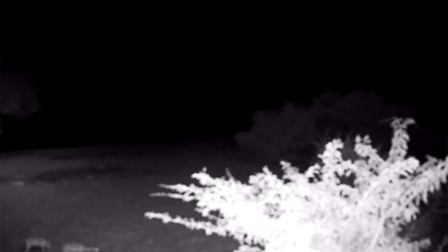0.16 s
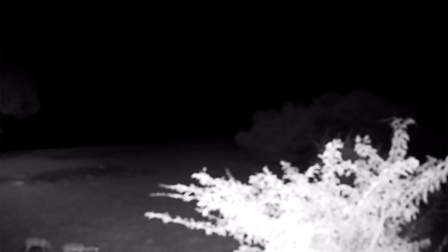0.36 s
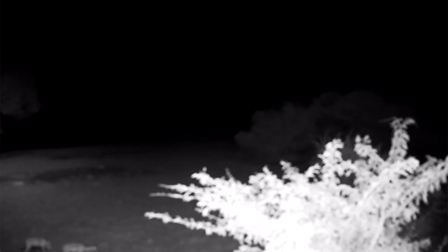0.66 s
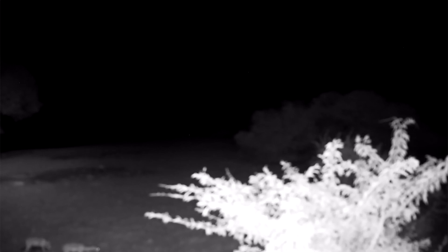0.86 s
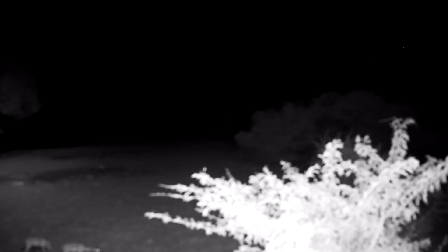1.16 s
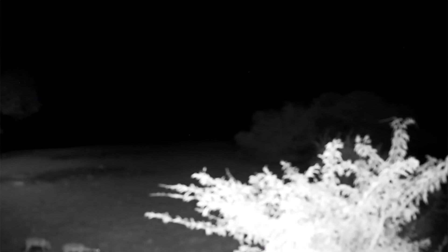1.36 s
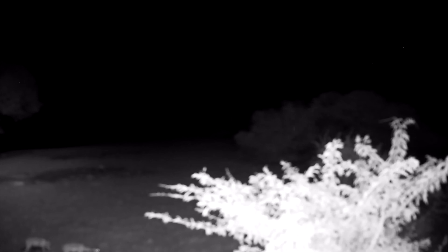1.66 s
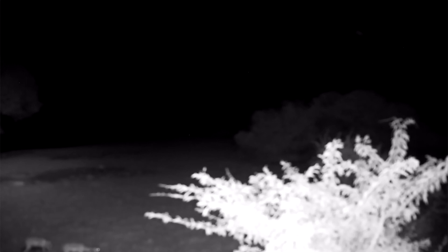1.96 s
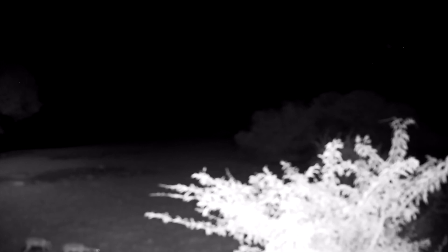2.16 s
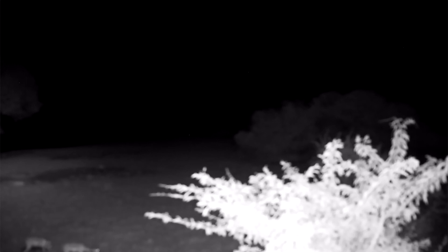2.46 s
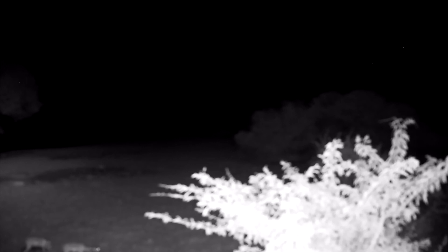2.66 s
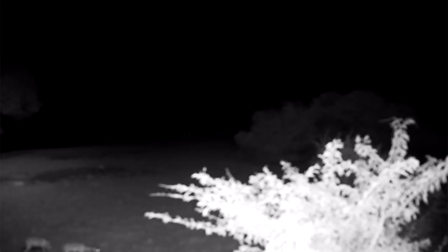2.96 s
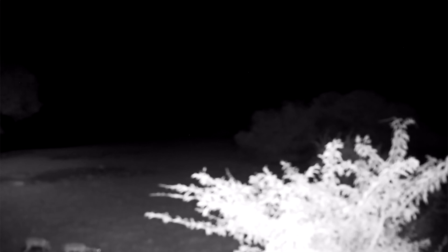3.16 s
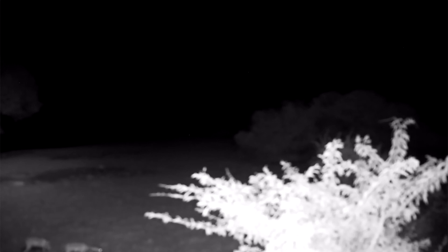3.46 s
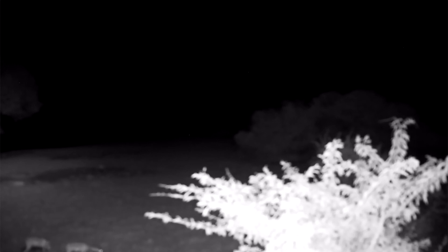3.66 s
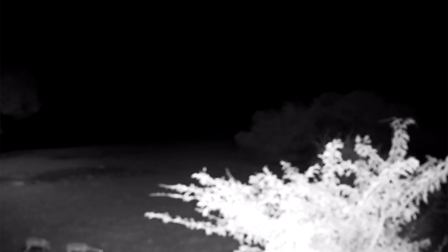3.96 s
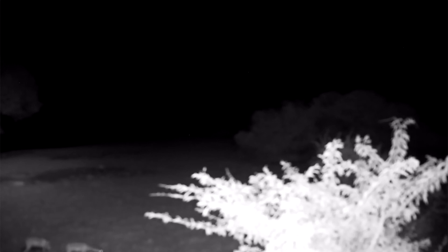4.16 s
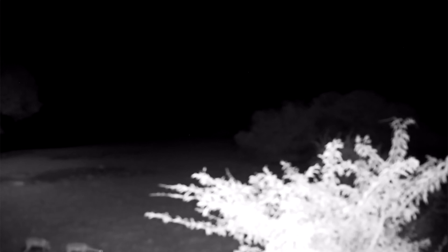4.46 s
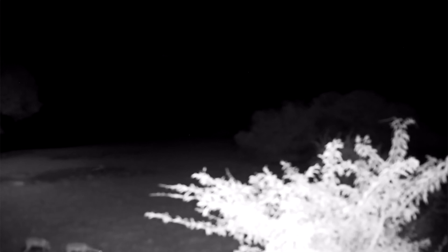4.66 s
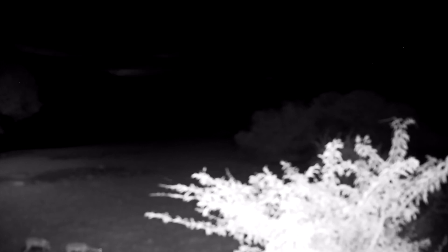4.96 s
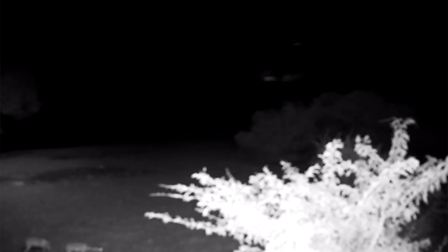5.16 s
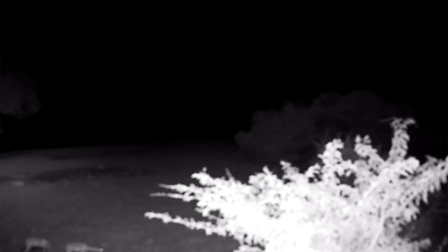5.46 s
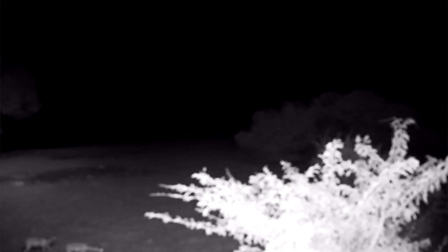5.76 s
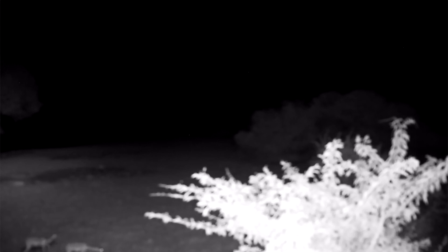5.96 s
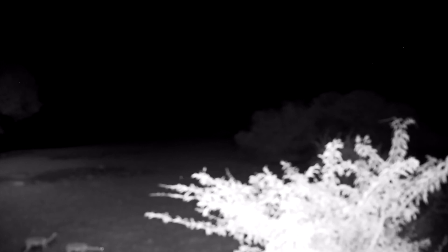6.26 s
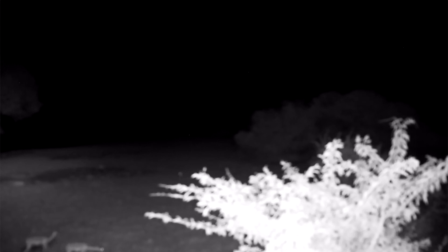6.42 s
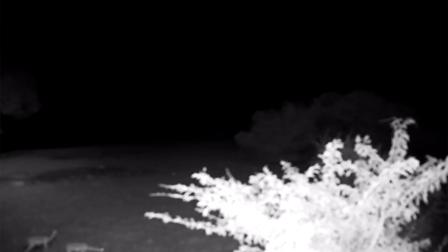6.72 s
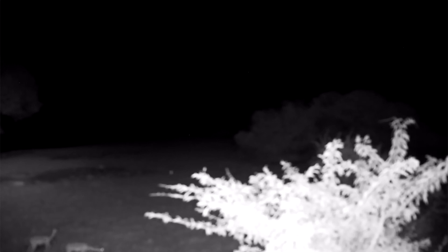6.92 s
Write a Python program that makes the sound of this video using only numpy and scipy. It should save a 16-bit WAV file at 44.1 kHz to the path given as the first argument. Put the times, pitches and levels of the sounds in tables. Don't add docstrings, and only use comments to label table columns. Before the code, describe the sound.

A nocturnal pondside scene, dense and bright throughout its seven seconds. Two frog choruses of tiny pulsed notes blur into a shrill bed, lower voices near 3 kHz and higher near 6 kHz, swelling to a peak around 4 s and easing near 5.2. Sharp taps click at 0.2 and 0.4 s. A prominent frog whistles short rising notes at about 0.4, 1.3, 2.1, 2.9, 3.7 (loudest), 4.4, 5.1, 5.9 and 6.7 s. Others make quick upward, water-drop whoops irregularly, with brief trills, strongest near 3 s. A field cricket gives five-pulse chirps nearly four times a second; a katydid rasps ten strokes a second, swelling and fading, beneath a thin high buzz and soft mole-cricket purr. Faint plops come around 6.5 and 6.9 s. Far traffic hums weakly, fullest near 4.7 s. The small open-air microphone sounds thin, with little bass and a cut top.

```python
import sys
import numpy as np
from scipy import signal
from scipy.fft import rfft, irfft
from scipy.io import wavfile
from scipy.ndimage import map_coordinates

SR = 44100
rng = np.random.default_rng(int(sys.argv[2]) if len(sys.argv) > 2 else 0)


def master_out(mix):
    frames = np.transpose(np.atleast_2d(mix))
    ceiling = np.clip(frames, -1, 1)
    pcm = np.round(ceiling * 32767).astype(np.int16)
    wavfile.write(sys.argv[1], SR, pcm)


def invert_db(x):
    u = np.asarray(x, float) / 20
    return 10 ** u


N = 312669
TIME = np.arange(N) / SR


def rms_one(x):
    return x / np.sqrt(np.mean(x ** 2) + 1e-20)


def band(x, low_hz, high_hz):
    return signal.sosfilt(signal.butter(3, [low_hz, high_hz], "band", fs=SR, output="sos"), x)


def drift(rate_hz):
    knots = rng.standard_normal(400)
    return map_coordinates(knots, [TIME * np.clip(rate_hz, .1, 50)], order=3)


def ticks(rate_hz):
    return np.flatnonzero(np.diff(np.floor(np.cumsum(rate_hz) / SR)))


def add_glide(out, times_s, hz, db):
    at = np.arange(round(times_s[0] * SR), min(round(times_s[-1] * SR), N))
    turns = np.cumsum(np.interp(at / SR, times_s, hz)) / SR
    out[at] += invert_db(np.interp(at / SR, times_s, db)) * np.sin(2 * np.pi * turns)


def pulses(start_s, gain, hz, rise_s, decay_s):
    age = np.arange(700) / SR
    shape = (1 - np.exp(-age / rise_s)) ** 2 * np.exp(-age / decay_s)
    wave = np.sin(2 * np.pi * (hz[:, None] * age + rng.random((len(hz), 1))))
    sound = gain[:, None] * shape / shape.max() * wave
    at = np.clip((start_s * SR).astype(int)[:, None] + np.arange(700), 0, N)
    return np.bincount(at.ravel(), sound.ravel(), N + 1)[:N]


def notes(centre_s, db, hz, period_s, decay_s, spread_hz, slide_hz, width_s, uneven_db, edge, count=9):
    chance = np.clip(rng.standard_normal((len(centre_s), count, 3)), -1.6, 1.6)
    step = np.arange(count) - count // 2
    offset_s = period_s * (step + .04 * uneven_db * chance[..., 0])
    effort = np.exp(-np.abs(offset_s / width_s) ** edge)
    gain = invert_db(db[:, None] + uneven_db * chance[..., 1]) * effort
    pitch_hz = hz[:, None] + slide_hz * step + spread_hz * chance[..., 2]
    start_s = centre_s[:, None] + offset_s - decay_s
    return pulses(start_s.ravel(), gain.ravel(), pitch_hz.ravel(), .0006, decay_s)


def bouts(rows):
    return np.transpose([(s + gap * k, db) for s, gap, count, db in rows for k in range(round(count))])


def echoes(x, bounces=()):
    # t/s, level/dB
    banks = [(.014, -30), (.03, -33), (.045, -27), (.062, -33), (.2, -52)]
    lag_s = np.arange(round(.2 * SR)) / SR
    smear = invert_db(np.interp(lag_s, *np.transpose(banks), left=-90))
    space = 0.19 * rng.standard_normal(len(lag_s)) * smear
    space[0] = 1
    for s, db in bounces:
        space[round(s * SR)] = invert_db(db)
    return signal.fftconvolve(x, space)[:N]


def air():
    # f/Hz, density/(dB per Hz)
    air_spectrum = [(60, -45), (110, -32), (200, -27.5), (540, -19.5), (800, -28), (1300, -34),
                    (1900, -20.5), (2400, -22), (4300, -22.5), (7200, -28), (8400, -69), (10000, -38),
                    (13000, -46)]
    # t/s, level/dB
    traffic = [(0, -57), (.7, -60), (1.5, -58.5), (2.2, -56), (3, -57), (3.5, -56), (3.9, -53),
               (4.7, -48.5), (5.6, -52), (6.3, -56), (7.09, -58.5)]
    hz = np.fft.rfftfreq(N, 1 / SR) + 1
    knot_hz, knot_db = np.transpose(air_spectrum)
    noise = rfft(rng.standard_normal(N)) * invert_db(np.interp(np.log(hz), np.log(knot_hz), knot_db))
    bass = 1 / (1 + (hz / 800) ** 4)
    hum = rms_one(irfft(noise * bass, N))
    hiss = rms_one(irfft(noise * (1 - bass), N))
    hum_db = np.interp(TIME, *np.transpose(traffic)) - 5.5
    return invert_db(hum_db) * hum + invert_db(-40 + 1.05 * drift(9)) * hiss


def mole_cricket(level_db):
    out = 0
    for rate_hz, db in [(91.4, 0), (87, -13)]:
        beats_s = ticks(rate_hz + 0.3 * drift(2.2)) / SR
        chance = rng.standard_normal((len(beats_s), 2))
        gain, hz = invert_db(db + 1.8 * chance[:, 0]), 1690 + 15 * chance[:, 1]
        out = out + pulses(beats_s, gain, hz, .003, .0022)
    return invert_db(level_db + 2.0) * rms_one(band(out, 1592, 1780))


def rasp(rate_hz, jitter_s, accent_db, modes):
    tooth = ticks(rate_hz * (1 + 0.0012 * drift(2.7)))
    chance = rng.standard_normal((len(tooth), 2))
    at = np.clip(tooth + (jitter_s * SR * chance[:, 0]).astype(int), 0, N - 1)
    accented = np.arange(len(tooth)) % 3 == 0
    clicks = np.zeros(N) + 1e-18
    clicks[at] = invert_db(accent_db * accented + 1.0 * chance[:, 1])
    out = 0
    for k, (hz, width_hz, db) in enumerate(modes):
        r = np.exp(-np.pi * width_hz / SR)
        poles = [1, -2 * r * np.cos(2 * np.pi * hz / SR), r * r]
        ring = signal.lfilter([1 - r * r, 0, r * r - 1], poles, clicks)
        out = out + (-1) ** k * invert_db(db) * ring
    return rms_one(out)


def high_buzz():
    # f/Hz, width/Hz, level/dB
    buzz_modes = [(10260, 200, -13), (10680, 190, 1.5), (11610, 710, 3.5), (11460, 290, -18),
                  (12360, 610, 4)]
    regular = rasp(584.4, .00002, 9.8, buzz_modes)
    ragged = rasp(1730, .0004, 0, buzz_modes)
    return invert_db(-57.5) * band(regular + 1.37 * ragged, 9600, 12200)


def katydid():
    # t/s, level/dB
    effort = [(0, -47.5), (.75, -44.5), (1.17, -52), (1.5, -45), (1.65, -49), (2.15, -38), (2.55, -45),
              (2.8, -34.5), (3.17, -43), (3.4, -34), (3.8, -32.5), (4.1, -43), (4.8, -34.5), (5.1, -40),
              (5.4, -43.5), (5.85, -33), (6.54, -47.5), (7.09, -34)]
    # t/s, level/dB
    stroke_shape = [(-.042, -40), (-.034, -12), (-.018, -4), (.005, 0), (.015, -2), (.02, -9), (.032, -40)]
    # f/Hz, width/Hz, level/dB
    wing_modes = [(6070, 1230, 4), (7580, 750, 8.5), (7802, 467, 8.5), (8690, 670, -8), (9150, 310, -10)]
    first_s, period_s = .088, .10232
    return_db = -21
    stroke = np.zeros(N + SR)
    shape = invert_db(np.interp(np.arange(-.045, .045, 1 / SR), *np.transpose(stroke_shape)))
    for s in np.arange(first_s, N / SR, period_s):
        db = np.interp(s, *np.transpose(effort)) + 1.0 * rng.standard_normal()
        stroke[round((s - .045) * SR):][:len(shape)] += invert_db(db) * shape
    teeth = sum(rasp(rate_hz, .0005, 0, wing_modes) for rate_hz in (380, 530, 710, 890))
    after = invert_db(np.interp(TIME, *np.transpose(effort)) + return_db)
    return invert_db(4) * (stroke[:N] + after) * band(rms_one(teeth), 6000, 9750)


def field_cricket():
    # t of first stroke/s, level/dB
    chirps = [(0.055, -25.5), (0.324, -27), (0.6, -25), (0.877, -27.5), (1.222, -24), (1.495, -24),
              (1.794, -22.5), (2.06, -24), (2.311, -26), (2.595, -26), (2.839, -29), (3.086, -43),
              (3.332, -26), (3.613, -25), (3.883, -23), (4.175, -28), (4.365, -25), (4.672, -26),
              (4.906, -35), (5.175, -24.5), (5.359, -25), (5.584, -22.5), (5.848, -26), (6.091, -27),
              (6.376, -22), (6.649, -23), (6.896, -23)]
    out = np.zeros(N)
    late_s = .0007 * rng.standard_normal((len(chirps), 5))
    for (s, db), jitter_s in zip(chirps, late_s):
        for start_s in s - .008 + .0313 * np.arange(5) + jitter_s:
            times_s = start_s + np.array([0, .004, .012, .017])
            add_glide(out, times_s, [5220, 5244, 5034, 4956], db + np.array([-9.5, -5.5, -9.5, -4.0]))
    return out


def knocks():
    # t/s, level/dB, f/Hz, decay/s
    taps = [
        (.226, -22, 1010, 0.00017),
        (.427, -29, 1020, 0.00014),
        (2.225, -51, 900, .0006),
        (2.39, -50, 900, .0006),
        (2.47, -45, 900, 0.00037),
        (6.483, -52.5, 767, 0.016),
        (.61, -54, 730, 0.0041),
        (6.928, -56, 840, 0.0017),
    ]
    out = 0
    for s, db, hz, decay_s in taps:
        out = out + pulses(np.array([s]), invert_db([db + 16]), np.array([hz]), 0.12 * decay_s, decay_s)
    return band(band(out, 500, 2600), 480, 1700)


def trill():
    # t of first note/s, gap/s, notes, level/dB
    trill_bouts = [
        (.035, 0.041, 5, -34),
        (3.004, 0, 1, -32),
        (3.036, .0455, 5, -27.5),
        (3.521, .038, 2, -35),
        (3.628, 0.052, 2, -36),
        (5.218, .045, 4, -31.5),
        (6.535, 0.052, 4, -37),
    ]
    s, db = bouts(trill_bouts)
    return notes(s - .001, db + 12, 4120 + 0 * s, period_s=0.0058, decay_s=0.00143, spread_hz=87,
                 slide_hz=20, width_s=.006, uneven_db=1.4, edge=5)


def whoops():
    # t/s, level/dB, climb/s, top f/Hz
    calls = [(0.251, -35.5, 0.025, 2370), (0.485, -37.5, 0.019, 2106), (0.516, -56, 0.075, 1674),
             (1.004, -33.5, 0.029, 2580), (1.263, -31, 0.029, 2204), (1.387, -48.5, 0.052, 1824),
             (1.491, -53.5, 0.07, 1770), (1.618, -35.5, 0.029, 2430), (1.677, -46, 0.024, 2150),
             (2.696, -41.5, 0.021, 2040), (2.73, -36.5, 0.032, 2320), (2.9, -37.5, 0.078, 2270),
             (2.981, -34.5, 0.024, 2320), (3.041, -52, 0.052, 1560), (3.168, -40, 0.022, 2035),
             (3.225, -52, 0.048, 1990), (3.926, -29, 0.025, 2053), (4.172, -33, 0.03, 2630),
             (4.895, -30.5, 0.033, 2445), (5.337, -31, 0.02, 2510), (5.472, -54, 0.06, 1660),
             (5.588, -32.5, 0.033, 2445), (6.064, -30.5, 0.027, 2070), (6.254, -37.5, 0.021, 1984),
             (6.292, -34.5, 0.039, 2410), (1.775, -49.5, .035, 1890), (5.07, -55, 0.049, 1760),
             (6.455, -46, 0.043, 1770), (6.34, -56, .045, 1600)]
    # t/s, level/dB
    bounces = [(.0035, -2), (.0073, -7), (.0112, -12)]
    out, share = np.zeros(N), np.array([0, .1, .3, .55, .8, 1])
    for s, db, climb_s, top_hz in calls:
        slow = climb_s > .05
        foot_hz, risen = 720, share ** 1.05
        if slow:
            foot_hz, risen = 900, np.array([0, .03, .08, .38, .75, 1])
        held = climb_s < .0305 and top_hz < 2300
        hold_s = max(.017 + .001 * (db + 30) if held else .002, .001)
        times_s = s + np.append(share * climb_s, climb_s + hold_s + np.array([0, .004]))
        end_hz = top_hz + 5000 * hold_s
        hz = np.append(foot_hz + (top_hz - foot_hz) * risen, [end_hz, end_hz])
        held_db = -6 + 380 * hold_s
        swell_db = slow * 7.5 * np.append(risen, [1, 1])
        shape_db = np.array([-18, -1, 1, 1, 3, held_db + 7, held_db, -25])
        add_glide(out, times_s, hz, db + swell_db + shape_db)
    return invert_db(1.0) * echoes(out, bounces)


def whistles():
    # t/s, level/dB, length/s
    calls = [
        (0.413, -16.5, 0.068),
        (1.305, -11, 0.06),
        (2.14, -12, 0.07),
        (2.884, -10.5, 0.064),
        (3.695, -7, 0.062),
        (4.44, -12, 0.063),
        (5.145, -13, 0.065),
        (5.911, -13, 0.067),
        (6.748, -11.5, 0.06),
    ]
    # share of length, f/Hz, level/dB
    bend = [(0, 2655, -24), (.06, 2650, -6), (.22, 2650, -4), (.4, 2750, 0), (.56, 2845, -.5),
            (.72, 2910, -3), (.86, 2945, -10), (1, 2930, -20), (1.3, 2780, -32)]
    out = np.zeros(N)
    share, hz, shape_db = np.transpose(bend)
    for s, db, length_s in calls:
        add_glide(out, s + share * length_s, hz, db + shape_db)
    return out


def chorus(near, far_db, hz, range_hz, near_db, count, **voice):
    s, db = bouts(near)
    own = np.clip(rng.standard_normal(len(s)), -1.5, 1.5)
    chance = rng.standard_normal((count, 2))
    far_s = rng.uniform(0, N / SR, count)
    far = notes(far_s, 1.12 * chance[:, 0], hz + range_hz * chance[:, 1], **voice)
    close = notes(s, db + near_db, hz + 0.78 * range_hz * own, **voice)
    return close + invert_db(far_db) * rms_one(far)


def frog_choruses(low_db, high_db):
    # t of first note/s, gap/s, notes, level/dB
    low_bouts = [(.103, 0.062, 4, -22), (.514, 0.055, 3, -20), (.706, 0.053, 3, -25.5),
                 (1.034, 0, 1, -22.5), (1.486, 0, 1, -27), (1.662, .049, 4, -20), (1.878, 0.026, 2, -19.5),
                 (2.031, 0, 1, -20), (2.252, .101, 2, -23), (2.403, 0, 1, -17), (2.596, 0.03, 2, -21),
                 (2.754, 0.02, 3, -22), (2.994, 0.065, 2, -19), (3.159, 0.14, 2, -23),
                 (3.433, 0.041, 3, -25), (3.617, 0, 1, -19.5), (3.806, .051, 4, -22),
                 (4.045, .0415, 5, -22.5), (4.345, 0.016, 1, -15.5), (4.602, .06, 2, -22),
                 (4.761, .112, 2, -21), (5.023, .04, 2, -24.5), (5.302, 0.043, 3, -24),
                 (5.554, 0.021, 1, -22), (5.77, 0.11, 2, -24.5), (6.022, 0.13, 4, -28), (6.442, 0, 1, -23),
                 (6.714, 0, 1, -18.5), (6.825, 0.033, 5, -22.5)]
    # t of first note/s, gap/s, notes, level/dB
    high_bouts = [(.019, .066, 2, -22.5), (.19, 0.037, 2, -23), (.31, 0.023, 2, -23.5),
                  (.434, .025, 2, -23.5), (.652, 0, 1, -23), (1.062, 0.17, 2, -28), (1.498, 0.014, 1, -24),
                  (1.781, 0.038, 3, -25.5), (2.054, .12, 2, -27), (2.372, 0.061, 2, -20.5),
                  (2.543, .056, 3, -25.5), (2.779, 0.17, 2, -22), (3.033, 0.029, 2, -22),
                  (3.202, 0.059, 4, -19.5), (3.453, 0.064, 4, -19), (3.738, 0.088, 2, -25),
                  (3.927, .076, 2, -19.5), (4.163, 0.054, 2, -26), (4.371, 0.074, 4, -21.5),
                  (4.61, 0.024, 3, -24.5), (4.776, .127, 3, -22.5), (5.224, 0.03, 3, -21.5),
                  (5.425, 0.023, 2, -22.5), (5.583, .049, 2, -24), (5.738, 0.085, 5, -23),
                  (6.06, 0.041, 3, -27), (6.267, 0.1, 2, -23), (6.469, 0.093, 2, -25.5),
                  (6.663, 0.09, 4, -22.5), (6.931, 0.052, 3, -22.5)]
    low = chorus(low_bouts, low_db + 0.86, 3147, 190, near_db=3.5, count=1000, period_s=.0038,
                 decay_s=0.001058, spread_hz=172, slide_hz=53.7, width_s=0.0084, uneven_db=2.5, edge=3.0)
    high = chorus(high_bouts, high_db + 0.15, 5891, 284, near_db=5, count=1100, period_s=.0024,
                  decay_s=.0008, spread_hz=207, slide_hz=-32, width_s=0.011, uneven_db=1.92, edge=2.0)
    return echoes(band(low, 2480, 4150) + band(high, 4850, 7180))


def scene():
    # t/s, low chorus level/dB, high chorus level/dB, mole cricket level/dB
    crowd = [
        (0.0, -30.5, -32.5, -45.5),
        (1.2, -33, -32, -48),
        (1.62, -31, -30, -51),
        (3.93, -28.5, -27, -41.5),
        (5.25, -33, -30, -46.5),
        (7.09, -31, -28, -45.5),
    ]
    s, *columns = np.transpose(crowd)
    low_db, high_db, cricket_db = [np.interp(TIME, s, c) for c in columns]
    insects = mole_cricket(cricket_db) + high_buzz() + katydid() + field_cricket()
    frogs = trill() + whoops() + whistles() + frog_choruses(low_db, high_db)
    return (air() + insects + knocks() + frogs)[None]


def top_cut(x):
    return signal.sosfilt(signal.butter(12, 12640, fs=SR, output="sos"), x)


def record(dry):
    thin = signal.sosfilt(signal.butter(3, 150, "high", fs=SR, output="sos"), dry)
    cut = signal.sosfilt(signal.cheby2(12, 60, 13900, fs=SR, output="sos"), thin)
    return top_cut(cut)


dry = scene()
out = record(dry)
master_out(out)
```